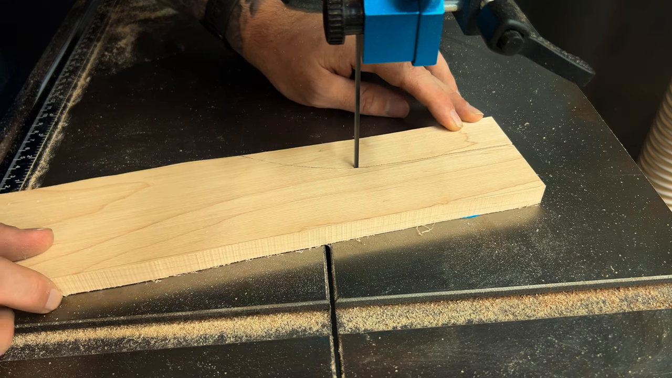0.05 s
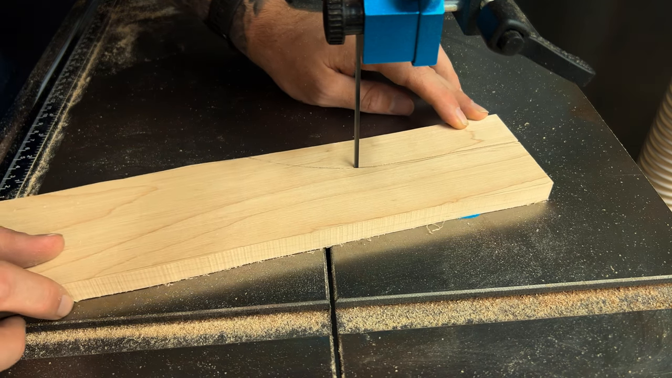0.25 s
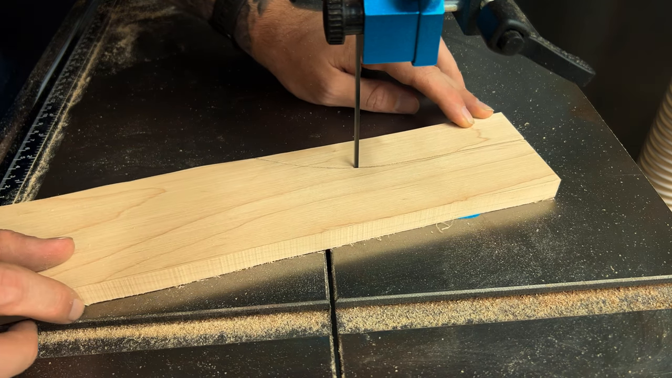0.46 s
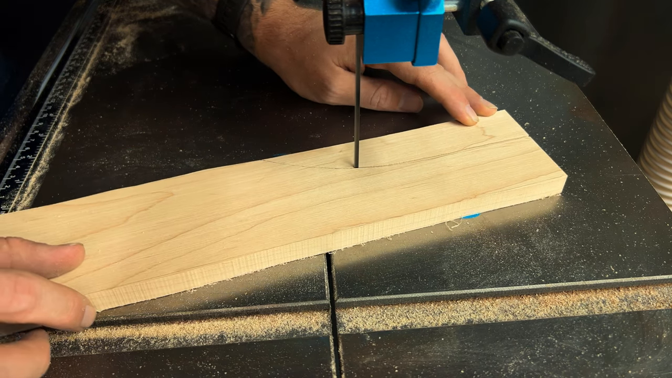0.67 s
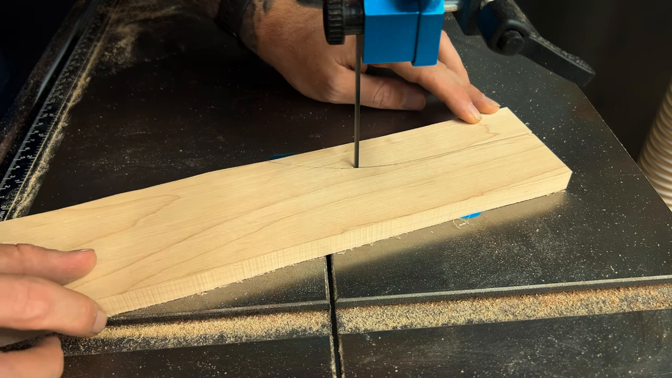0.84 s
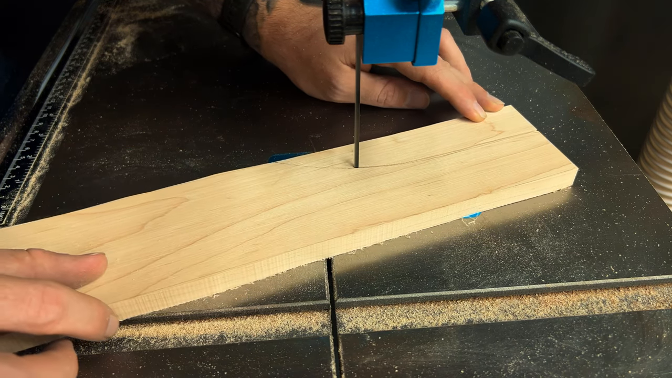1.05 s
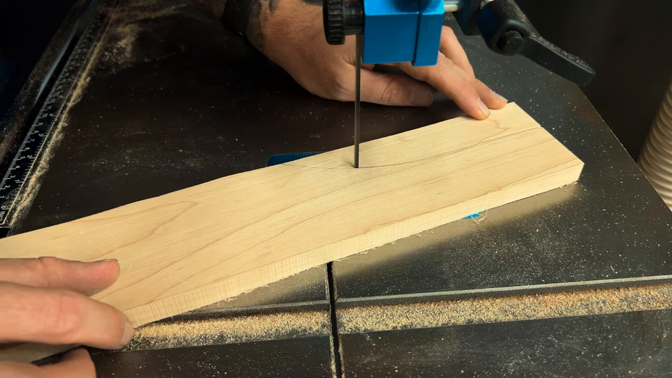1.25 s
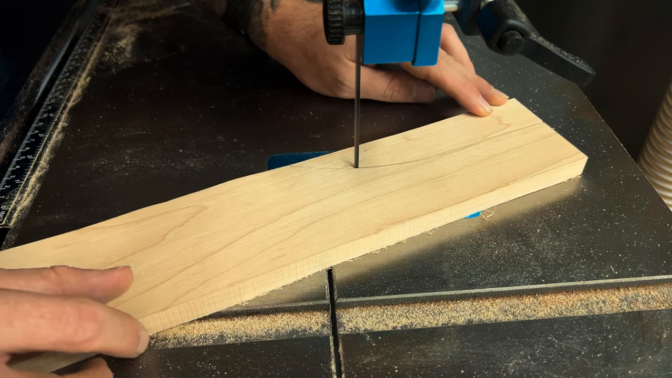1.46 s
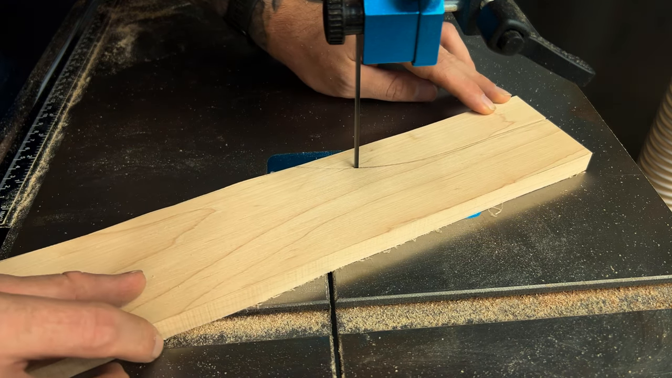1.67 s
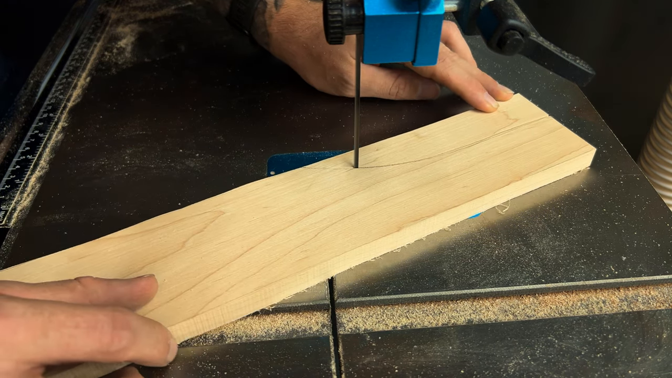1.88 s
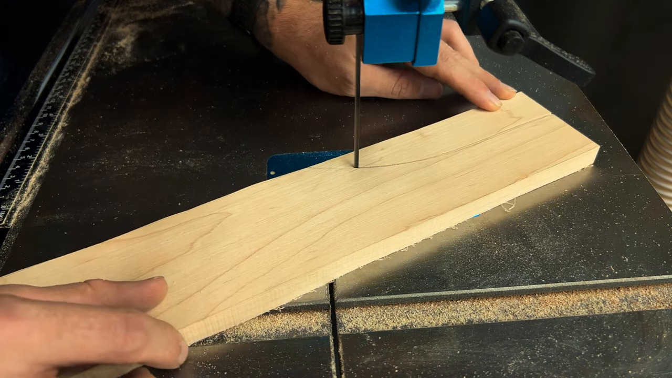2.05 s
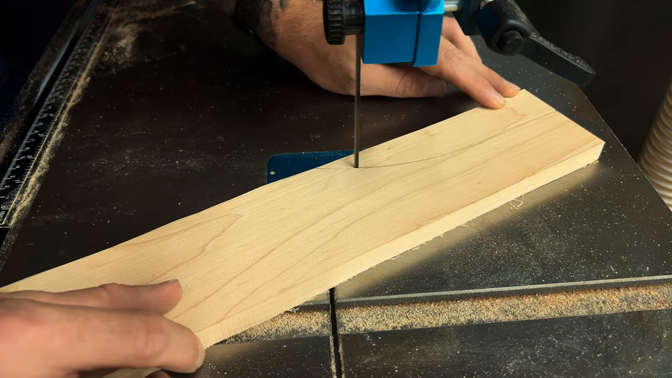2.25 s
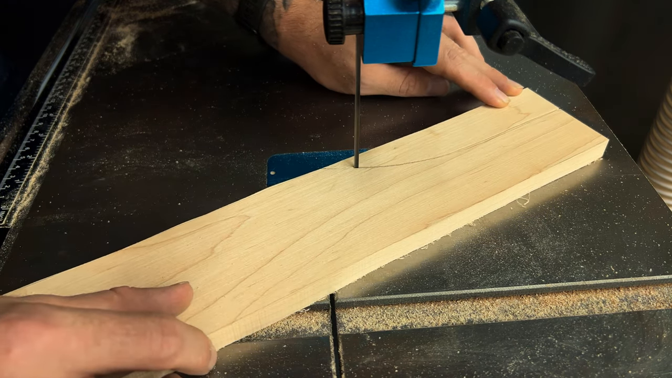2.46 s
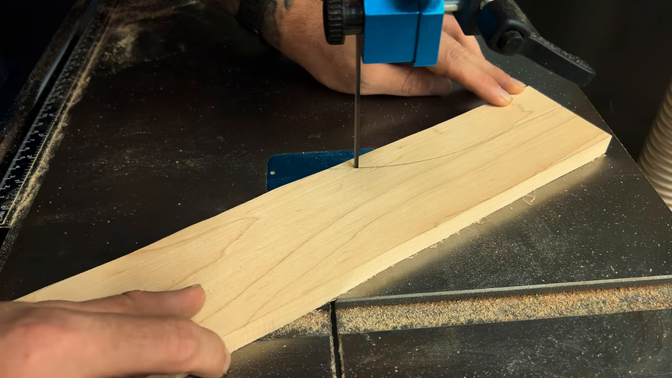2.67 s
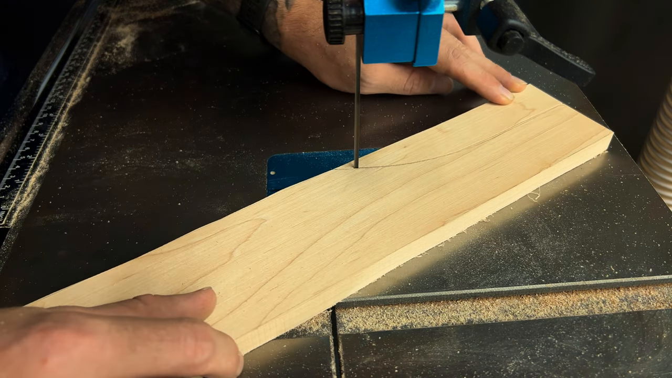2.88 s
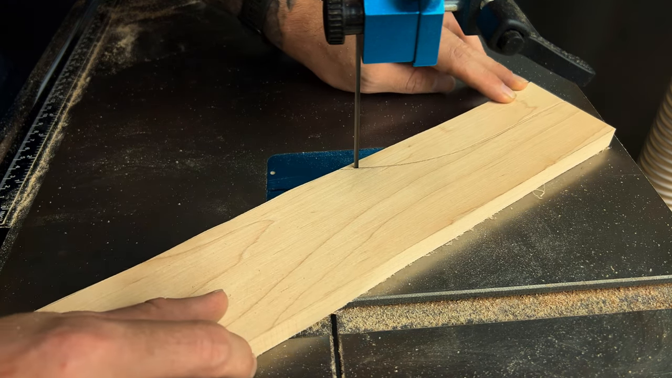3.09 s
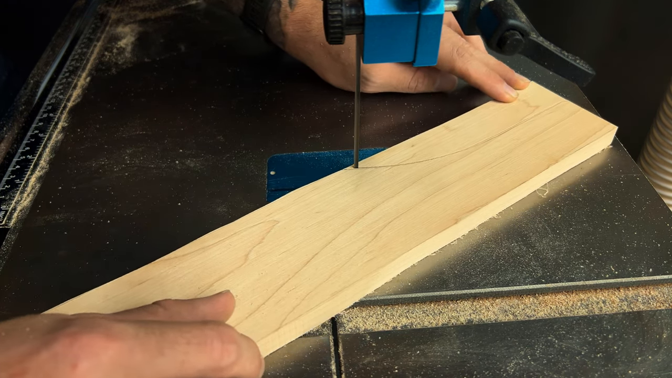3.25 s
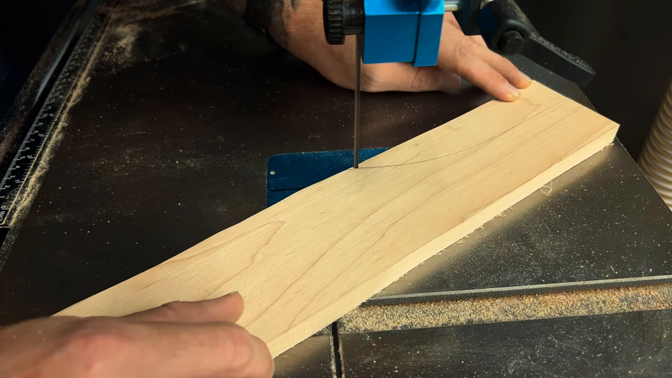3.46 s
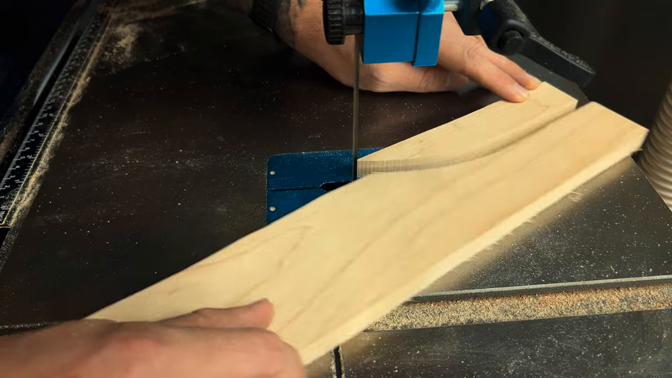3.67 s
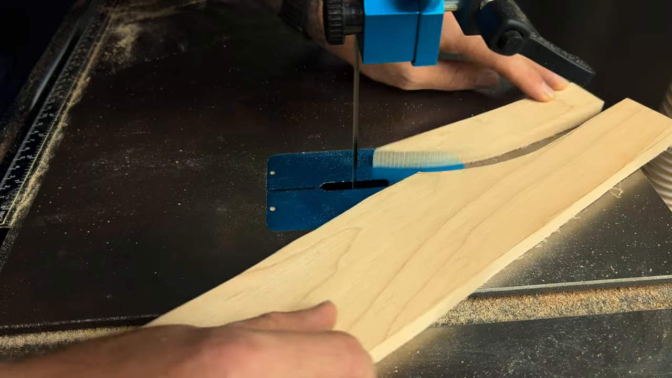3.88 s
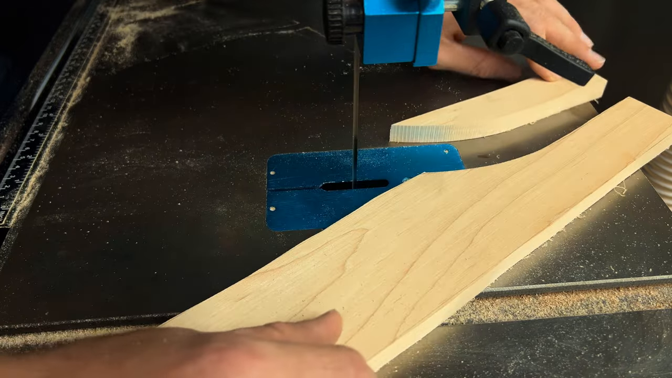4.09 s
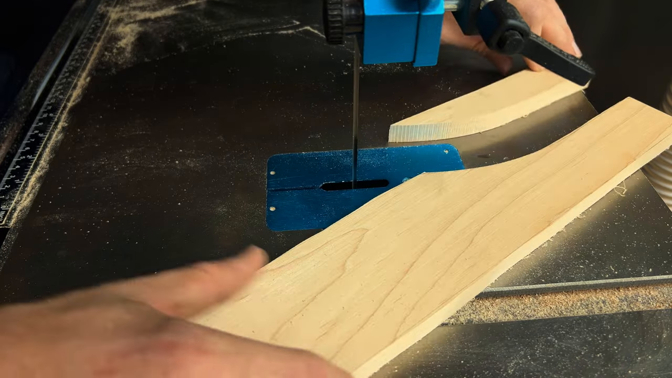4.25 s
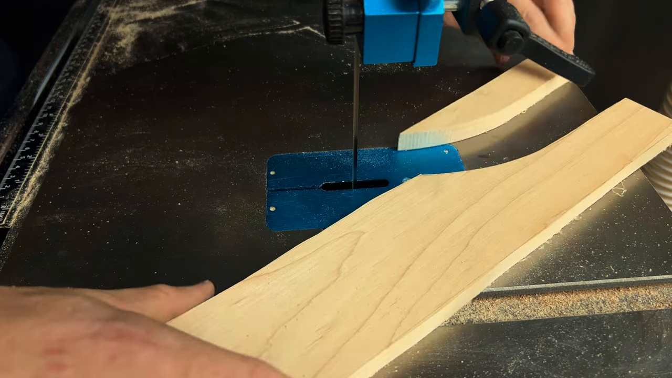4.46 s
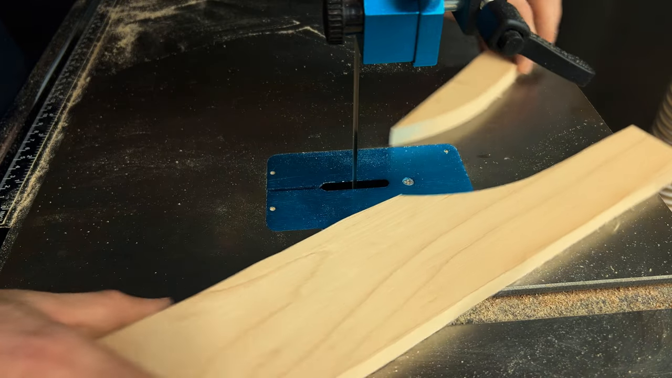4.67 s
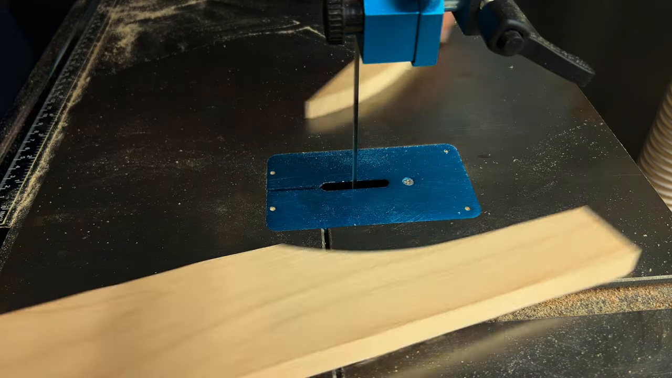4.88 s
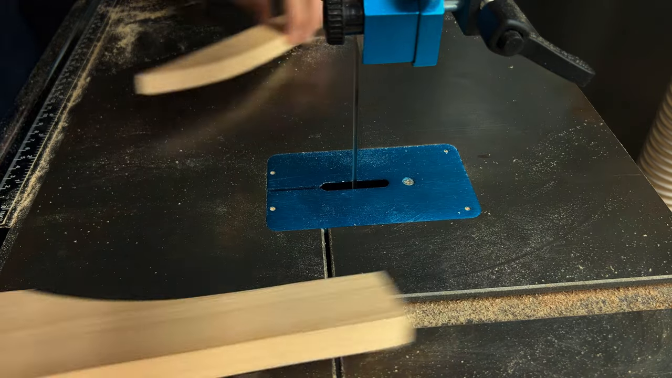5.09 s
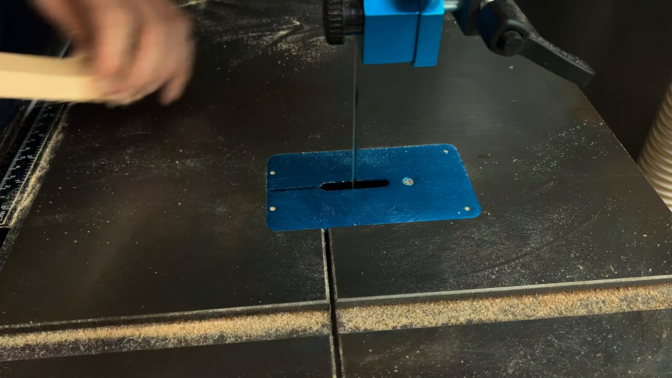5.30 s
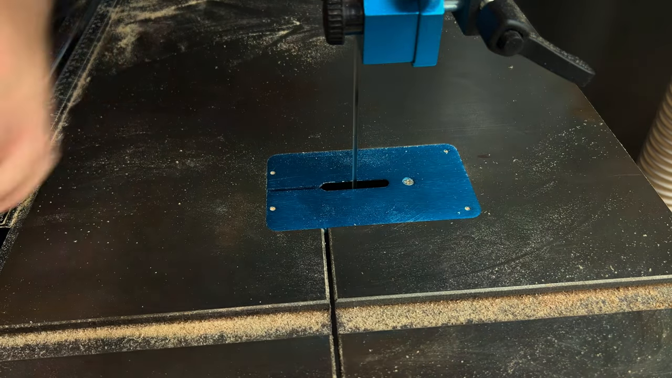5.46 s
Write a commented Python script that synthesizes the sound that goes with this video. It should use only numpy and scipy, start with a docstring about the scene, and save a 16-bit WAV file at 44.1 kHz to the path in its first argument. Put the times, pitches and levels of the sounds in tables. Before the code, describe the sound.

The recording starts mid-cut: a bandsaw blade squeals loudly through a hardwood board at about 4 kHz, blurred and wavering, with a rough octave near 8 kHz and bright hissing rasp. The blade flutters about seventeen times a second, and irregular brief slips of some hundredths of a second make the squeal stutter. From about 0.9 to 2.5 seconds it is harshest, with growl and sharp little chirping digs. Around 2.6 seconds the tone begins to weaken while rasp, ringing and thin whistles near 10 kHz come forward. At 3.6 seconds the blade leaves the wood and everything shrill stops within milliseconds, with a short room reverberation. Until about 5.5 seconds only a much quieter motor hum and low rumble remain, with faint hiss and soft metallic brushes roughly every 0.15 seconds, strongest at first and fading. Close stereo, squeal leaning left.

```python
"""A bandsaw blade squeals near 4 kHz as it cuts a hardwood board in a workshop, then runs free.
Stick-slip gives the squeal, a rough octave and a growl; the blade flutters in the kerf and loses its bite
for moments. Chips rasp, and noise shaped by resonances gives the broad rings of blade and board.
Under it the motor hums and rumbles and the blade brushes its guides."""
import sys
import numpy as np
from scipy import signal
from scipy.fft import rfft, irfft, next_fast_len
from scipy.io import wavfile
from scipy.ndimage import uniform_filter1d, map_coordinates

SR = 44100
rng = np.random.default_rng(int(sys.argv[2]) if len(sys.argv) > 2 else 0)


def to_wav(s):
    """Save 16-bit WAV."""
    ch = np.atleast_2d(s).T  # columns
    pcm = np.round(np.clip(ch, -1, 1) * 32767)  # PCM
    wavfile.write(sys.argv[1], SR, pcm.astype(np.int16))


N = 243873
T = np.arange(N) / SR
EXIT_S = 3.596  # the blade leaves the wood
FLUTTER_HZ, FLUTTER_CREST_S = 16.68, 0.0433  # sideways swing of the blade, and its first slack moment

# The turning board reflects differently to each side. Each row: time in seconds, radians by which left leads
# in the tone, same in the octave, left-right difference in dB of the tone, of the octave, of the rings.
TURN = [(0, 0.6, -0.54, 3, 8, 6.5), (.3, 1.28, -0.34, 2, 6.5, 4.8), (.6, 2, -.2, 12.5, 10.5, 7),
        (.8, 1.04, -.6, 5, 13, 5.7), (1.1, -2, -.4, 4, 8.5, 7.6), (1.5, 0.3, 0, 6, 4.5, 4),
        (2.1, -0.5, 0, 4, 7.5, 1.4), (2.5, 0.3, .4, 3.5, 1.5, .7), (2.8, 0.5, .3, 5, 2, 1.2),
        (3.1, 0.1, .4, 0.5, 8, 1), (3.6, -0.4, .4, -1, 4.5, 1)]


def amp(db):
    """Gain of a level in dB."""
    return 10 ** (np.asarray(db) / 20)


def unit(x):
    """x at rms 1."""
    return x / np.sqrt(np.mean(x ** 2) + 1e-20)


def along(points, hz):
    """Values at hz, interpolated between (Hz, value) points on a log axis."""
    point_hz, values = np.transpose(points)
    return np.interp(np.log(hz + 1), np.log(point_hz + 1), values)


def spectrum(points):
    """Response through (Hz, dB) points."""
    return lambda hz: amp(along(points, hz))


def even(value):
    """The same value at every frequency."""
    return lambda hz: value + 0 * hz


def peak(f, hz, width_hz):
    """Size of a resonance, 1 at its centre."""
    return np.abs(f * width_hz / (hz * hz - f * f + 1j * f * width_hz))


def curves(rows):
    """One value per sample for each column after the time."""
    seconds, *columns = np.transpose(rows)
    return [np.interp(T, seconds, column) for column in columns]


def wobble(rate_hz):
    """A smooth random curve, rate_hz knots a second."""
    knots = rng.standard_normal(int(N * rate_hz / SR) + 4)
    return map_coordinates(knots, [T * rate_hz])


def filtered(x, response):
    """x times a response of frequency."""
    size = next_fast_len(N + SR // 4)
    hz = np.fft.rfftfreq(size, 1 / SR)
    return irfft(rfft(x, size) * response(hz), size)[..., :N]


def pan(lean_db):
    """Left and right gains for a left-right difference."""
    return amp(np.array([lean_db / 2, -lean_db / 2]))


def rush(response, alike):
    """Stereo noise with its mid part at rms 1; alike(hz) is the likeness of the two sides."""
    def mid_side(hz):
        turn = np.arccos(np.clip(alike(hz), -1, 1)) / 2
        return response(hz) * np.array([np.cos(turn), np.sin(turn)])

    mid, side = filtered(rng.standard_normal((2, N)), mid_side)
    return np.array([mid + side, mid - side]) / np.sqrt(np.mean(mid ** 2))


def fuzzy(turns, fuzz_hz, clean, lead=0):
    """A stereo tone blurred by random swings of size and phase, rms 1; left leads by lead radians."""
    blur = wobble(fuzz_hz) + 1j * wobble(fuzz_hz)
    side_phase = .5 * lead * np.array([[1], [-1]])
    return unit(((clean + blur) * np.exp(2j * np.pi * turns + 1j * side_phase)).real)


def patchy(x, patchy_db):
    """x with patches of random gain in time and frequency."""
    z = signal.stft(x, nperseg=512)[2]
    field = uniform_filter1d(rng.standard_normal(z.shape[1:]), size=2, axis=0)  # over frequency
    field = uniform_filter1d(field, size=22, axis=1)  # over time
    return signal.istft(z * amp(patchy_db * unit(field)), nperseg=512)[1][:, :N]


def gripped(bite, share):
    """Gain for a layer that follows the bite in part; its slow mean power stays 1."""
    gain = amp(share * bite)
    return gain / np.sqrt(np.abs(uniform_filter1d(gain ** 2, size=SR // 4)))


def bite_db():
    """Grip of the teeth on the wood: flat-bottomed drops, slight at each flutter swing, deep at each slip."""
    # The blade clearly loses its bite. Each row: time in seconds, length in ms, depth in dB.
    slips = [(.045, 17, 6), (.099, 25, 12.5), (.225, 14, 10), (.286, 24, 16), (.354, 33, 8.5),
             (.405, 9, 9.5), (.457, 35, 6), (.516, 18, 13.5), (.592, 13, 25.5), (.695, 30, 8.5),
             (.755, 18, 5.5), (.815, 8.3, 7.5), (.907, 8, 9.5), (1, 31.2, 22), (1.063, 18, 20.5),
             (1.117, 24, 5.5), (1.351, 13, 19), (1.376, 13, 21.5), (1.433, 8, 8.5), (1.482, 15, 11.5),
             (1.535, 9, 18.5), (1.605, 19, 8), (1.672, 18.7, 5.5), (1.709, 9, 12.5), (1.77, 20, 15.5),
             (1.84, 36, 18.5), (1.948, 14, 11.5), (1.998, 7, 15.5), (2.073, 9, 12), (2.14, 26, 10),
             (2.193, 13, 6), (2.252, 13, 6), (2.38, 8, 5.5), (2.921, 14, 11), (3.037, 16, 8),
             (3.102, 13, 16.5), (3.231, 12, 9), (3.259, 7, 11), (3.295, 22, 10.5), (3.382, 7.4, 6.5),
             (3.47, 20, 12)]
    slack_ms, slack_db, slack_scatter_s = 14.8, 3, .008
    drop, regain = 0.462, 0.693  # fall and rise time scales as shares of the length
    swings = np.arange(FLUTTER_CREST_S, EXIT_S, 1 / FLUTTER_HZ)
    chance = rng.standard_normal((round(N / SR * 20), 2))
    slack = [(s + slack_scatter_s * a, slack_ms, slack_db * abs(b)) for s, (a, b) in zip(swings, chance)]
    grip_db = np.zeros(N)
    for s, ms, db in slack + slips:
        near = slice(max(round((s - .06) * SR), 0), round((s + .06) * SR))
        late_ms = 1000 * (T[near] - s)
        scale_ms = ms * np.where(late_ms < 0, drop, regain)
        grip_db[near] -= db * np.exp(-np.abs(late_ms / scale_ms) ** 2.9)
    return grip_db


def squeal(bite):
    """Stick-slip at the teeth: slack raises the pitch; spiky growl lies below, a rough octave above."""
    # The cut curves, binds and frees. Each row: time in seconds, level in dB of the tone, of the growl
    # below it, of the octave.
    levels = [(0, -27, -52.5, -47), (.35, -28.5, -49, -40), (.65, -30.5, -44, -43.5),
              (1.05, -25, -35, -42.5), (1.4, -28, -33.5, -48), (1.8, -30, -33, -50),
              (2.2, -26.5, -31.5, -43), (2.4, -28.5, -37.5, -50), (2.6, -28.5, -38, -38),
              (3.0, -35, -43.5, -38), (3.2, -36, -46, -45), (3.4, -39, -47, -41.5),
              (3.58, -33.5, -54.5, -33)]
    # Each row: time in seconds, mean pitch in Hz, ratio of the pure tone to its blur.
    pitch = [(0, 4010, 3.5), (.4, 3983, 3), (.65, 3966, 1.86), (.8, 4030, 2.55), (1.3, 4010, 3),
             (1.7, 3966, 3), (2.1, 3990, 2.75), (2.5, 4004, 3.1), (2.8, 3984, 4), (3.1, 3963, 4.6),
             (3.6, 4025, 2.6)]
    # Growl spectrum. Each row: frequency in Hz, relative density in dB.
    growl_points = [(1500, -91.5), (2700, -33.5), (3200, -15.5), (3500, -11.5), (3620, 2), (3750, -0.5),
                    (3900, 5.5), (4020, -6), (4200, -6), (4500, -50.5), (6000, -90)]
    tone_db, growl_db, octave_db = curves(levels)
    lead, octave_lead, lean_db, octave_lean_db, _ = curves(TURN)
    pitch_hz, purity = curves(pitch)
    slack = np.cos(2 * np.pi * FLUTTER_HZ * (T - FLUTTER_CREST_S))
    hz = pitch_hz + 24 * slack + 12 * wobble(45) - .8 * (bite - bite.mean())
    turns = np.cumsum(hz) / SR

    tone = amp(tone_db) * gripped(bite, 0.75) * fuzzy(turns, fuzz_hz=200.9, clean=purity, lead=lead)

    spikes = gripped(1.2 * bite - 1.6 * slack + 4 * np.tanh(wobble(200)), 1)
    growl = amp(growl_db) * spikes * rush(spectrum(growl_points), even(1))

    core = fuzzy(2 * turns - 70 * T, fuzz_hz=218.0, clean=0.35, lead=octave_lead)  # 70 Hz flat
    skirt = rush(lambda f: peak(f, 7780, 500) ** 2, even(.4))
    octave_gain = amp(octave_db) * gripped(bite - 1.1 * slack + 1.7 * wobble(45), 1.6)
    octave = octave_gain * (core + 0.72 * skirt)
    return (tone + growl + digs(turns, growl_db)) * pan(lean_db) + octave * pan(octave_lean_db)


def rings(bite):
    """Tooth scrape excites each broad resonance; each swells in its own short bursts."""
    # Rings of blade and board. Each row: centre in Hz, width in Hz, share of the bite it follows,
    # left-right likeness.
    resonances = [(4990, 480, 0.24, .93), (5976, 440, 0.97, 1), (8970, 1100, 0.49, .7)]
    # Each row: time in seconds, level in dB of each of the three resonances.
    drive = [(0, -40.5, -41, -48.5), (.25, -40, -39, -43), (.6, -36, -52, -48), (1.0, -36.5, -63.5, -50.5),
             (1.35, -38, -56, -52), (1.65, -40.5, -50.5, -47.5), (2.2, -49, -59, -53),
             (2.42, -46.5, -56, -51.5), (2.6, -39, -42.5, -51.5), (3.0, -37.5, -39, -44.5),
             (3.58, -35, -37.5, -44.5)]
    # A ring that sinks as the freed strip of wood grows. Each row: time in seconds, pitch in Hz, level in dB.
    strip = [(0, 7350, -56.5), (.9, 7210, -50), (1.3, 7480, -47.5), (1.6, 7215, -42), (2, 6970, -44),
             (2.3, 6850, -41.5), (2.6, 6840, -58.5), (3.6, 6720, -42)]
    out = board(bite)
    for (hz, width_hz, share, alike), db in zip(resonances, curves(drive)):
        ring = rush(lambda f: peak(f, hz, width_hz) ** 2, even(alike))
        out += amp(db) * gripped(bite * share + 2.3 * wobble(35), 0.59) * ring
    strip_hz, strip_db = curves(strip)
    strip_ring = fuzzy(np.cumsum(strip_hz) / SR, fuzz_hz=853, clean=0)
    out += amp(strip_db) * gripped(bite, 0.27) * strip_ring
    return patchy(out, patchy_db=2.5) * pan(curves(TURN)[-1])


def board(bite):
    """The board drums in two narrow bands that slide and swell as the cut grows."""
    # Each row: time in seconds, low band in Hz, its level in dB, upper band in Hz, its level in dB,
    # looseness of the upper band 0-1.
    bands = [(0, 1010, -75.5, 2000, -53.5, 0.2), (.25, 1004, -66.5, 2003, -52, 0.26),
             (.8, 1004, -68, 1973, -61, 0), (1.3, 992, -61.5, 2005, -59.5, .6),
             (1.9, 985, -67.5, 2046, -58.5, .8), (2.4, 988, -59, 2102, -60, 0.89),
             (2.62, 1021, -55.5, 2107, -48.5, 0.8), (3.1, 995, -56.5, 2086, -54.5, 0.9),
             (3.42, 886, -59, 2000, -52.5, 0.85), (3.6, 857, -76, 1975, -55, 0.96)]
    low_hz, low_db, upper_hz, upper_db, loose = curves(bands)
    low = fuzzy(np.cumsum(low_hz) / SR, fuzz_hz=242.6, clean=0, lead=-.6)
    low_gain = amp(low_db) * gripped(0.16 * bite + 2.2 * wobble(25), 0.82)
    turns = np.cumsum(upper_hz) / SR
    tight_band = fuzzy(turns, fuzz_hz=199.6, clean=0)
    loose_band = fuzzy(turns, fuzz_hz=567.0, clean=0)
    upper = (1 - loose) * tight_band + loose * loose_band
    upper_gain = amp(upper_db) * gripped(0.58 * bite + 1.8 * wobble(25.06), 0.91)
    return low_gain * low + upper_gain * upper


def chips(bite):
    """Wide noise rasp of torn fibres, with the blade's whistles, blurred tones, on top."""
    # Rasp spectrum. Each row: frequency in Hz, relative density in dB.
    rasp_points = [(60, -91.5), (300, -29.5), (650, -7), (1300, -9), (2700, 0.5), (3300, 7.5), (4400, 9),
                   (6600, 2), (8600, 2.5), (11000, 0), (12300, 2), (12800, -6), (14500, -5.5), (15900, -14)]
    # Each row: pitch in Hz, relative level in dB, blur in Hz, start in seconds.
    whistles = [(10428, 0, 30, -1), (10556, -9, 40, 2.7), (9920, -3, 150, 2.9), (14400, -7, 120, 3.1)]
    # Each row: time in seconds, level of the whistles in dB.
    whistling = [(0, -59), (.2, -53), (.6, -54.5), (.8, -70.5), (1.2, -61.5), (1.6, -68.5), (2.2, -53),
                 (2.4, -54), (2.8, -51.5), (3.3, -50), (3.58, -58)]
    rasp_db = -42.5 + 2.5 * np.maximum(T - 1.61, 0)  # grows 2.5 dB/s from 1.61 s as the teeth near the edge
    rasp = rush(spectrum(rasp_points), lambda f: np.interp(f, [7000, 10000, 12000], [.7, .5, .97]))
    rasp_gain = amp(rasp_db) * gripped(0.48 * bite + 1.1 * wobble(12) + 2.1 * wobble(300), 0.41)
    out = rasp_gain * patchy(rasp, patchy_db=3.5)
    whistle_db, = curves(whistling)
    for hz, db, blur_hz, start_s in whistles:
        fade_in = np.clip((T - start_s) / 0.23, 0, 1)
        out += amp(whistle_db + db) * fade_in * fuzzy(hz * T, fuzz_hz=blur_hz, clean=1.2, lead=-0.55)
    return out


def motor(in_wood):
    """Hum lines that waver, over the rumble of frame and wheels; load shifts their levels a little."""
    # Pitch of each hum line in Hz.
    hum_hz = [58.8, 120.2, 356.7, 570, 713.4, 1070.1, 1107.6, 1167.8, 1426.8, 1783.5]
    # Each row, one per line: level in dB, left-right difference in dB, radians by which left leads,
    # waver in dB, rise under load in dB.
    hum = [(-69, 0.2, -0.1, 2.5, 1), (-64.5, 2, 0.5, 2, 0.5), (-57.5, -5, -1.5, 1.4, -0.45),
           (-73, -2.5, 1.1, 5, -1.5), (-70, -2, 1.5, 1, 1), (-76, -5, 2.9, 2.5, 0),
           (-83, -3.5, 2.3, -0.5, 5), (-79.5, -2.5, 2.4, 1, 6.5), (-65.5, -5, -1.5, 2.5, 5),
           (-87, 1.5, -0.5, -1, 0.5)]
    # Rumble spectrum. Each row: frequency in Hz, relative density in dB.
    rumble_points = [(20, -36.5), (45, -8.5), (75, -9.5), (130, -1), (230, 2), (270, -7), (420, -12),
                     (580, -8), (700, -13), (800, -17), (880, -13), (1080, -13), (1250, -24.5), (1400, -16),
                     (1520, -19.5), (1850, -30.5), (1935, -14.5), (2020, -22), (3000, -31.5), (4500, -38),
                     (8000, -85.5)]
    # Each row: frequency in Hz, left-right likeness of the rumble.
    alike_points = [(30, .997), (60, .995), (130, .93), (220, .85), (290, .6), (640, .62), (1400, .5),
                    (2500, .65)]
    # Each row: frequency in Hz, left-right difference of the rumble in dB.
    lean_points = [(30, 0), (60, 0), (90, 1), (130, 4), (250, 0), (600, -2.5), (1300, -3), (2400, 1.5)]
    rumble_db = -57.0 + 1.1 * wobble(11) + 1.1 * in_wood
    out = amp(rumble_db) * rush(spectrum(rumble_points), lambda f: along(alike_points, f))
    out = filtered(out, lambda f: pan(along(lean_points, f)))
    for hz, (db, lean_db, lead, waver_db, load_db) in zip(hum_hz, hum):
        angle = 2 * np.pi * hz * T + 0.56 * wobble(6.9) + rng.uniform(0, 2 * np.pi)
        sides = np.sin(angle + np.array([[lead / 2], [-lead / 2]]))
        level_db = db + waver_db * np.tanh(wobble(12) + 1.8 * wobble(30)) + load_db * in_wood
        out += np.sqrt(2) * amp(level_db) * pan(lean_db)[:, None] * sides
    return out


def guides():
    """Over steady air hiss and block ring, both swell as the blade loop brushes its guides."""
    # Resonances of the guide blocks. Each row: centre in Hz, width in Hz, relative level in dB.
    block_rings = [(1935, 83, 6), (4870, 350, 0.3), (5590, 160, -2), (7000, 380, -4.5)]
    # Hiss spectrum. Each row: frequency in Hz, relative density in dB.
    hiss_points = [(300, -90.5), (1500, -28), (2600, 11), (3500, 3), (6000, 1.5), (8400, -1.5),
                   (11000, 1.5), (12500, -2.5), (15000, 0), (15900, -5.5)]
    idle_db, air_db = -78.5, -78.5

    def block_response(f):
        return sum(amp(db) * peak(f, hz, width_hz) ** 1.2 for hz, width_hz, db in block_rings)

    blocks = rush(block_response, even(.75))
    hiss = rush(spectrum(hiss_points), lambda f: np.interp(f, [3000, 14000], [.65, .92]))
    block_gain = (amp(idle_db) + brushing(swing=1, at_db=-74.0)) * amp(1.5 * wobble(60))
    hiss_gain = amp(air_db) + brushing(swing=1.1, at_db=-75)
    return block_gain * blocks + hiss_gain * hiss


def shop(x):
    """Room reverberation: noise in which each frequency dies at its own speed."""
    # Each row: frequency in Hz, time to fall 60 dB in seconds.
    decay_points = [(500, 0.72), (2000, .45), (4000, 0.46), (8000, 0.39), (11000, 0.61), (15000, 0.7)]
    hz, t, z = signal.stft(rng.standard_normal((2, SR // 2)), SR, nperseg=256)
    fall_db = -60 * t / along(decay_points, hz)[:, None]
    tail = signal.istft(z * amp(fall_db), SR, nperseg=256)[1]
    return signal.fftconvolve(x, tail / np.linalg.norm(tail[0]), axes=1)[:, :N]


def digs(turns, growl_db):
    """A tooth digs in: a burst of a few ms, begun in phase with the squeal and pitched at or below 3952 Hz."""
    # Hard digs. Each row: time in seconds, peak in dB.
    jabs = [(.3048, -25), (.9182, -20.5), (1.0265, -27), (1.0796, -22.5), (1.2483, -18), (1.3889, -22.5),
            (1.4642, -28), (1.5023, -21.5), (1.6445, -19.5), (1.7324, -20.5), (1.8054, -21.5),
            (1.8663, -21.5), (1.921, -19.5), (2.0284, -22.5), (2.109, -22.5), (2.431, -22.5),
            (2.5038, -19.5)]
    dig_hz, spread_hz, rise_s = 3952, 130, .0018
    out, t = np.zeros(N), np.arange(SR // 60) / SR
    # lesser digs at random moments, about 9 dB over the growl
    moments, sizes = rng.uniform(0, EXIT_S, size=60), rng.standard_normal(size=60)
    small = [(s, growl_db[round(s * SR)] + 9 + 3 * size) for s, size in zip(moments, sizes)]
    swell = (t / rise_s) ** 2 * np.exp(2 - 2 * t / rise_s)
    for s, db in small + jabs:
        start = round(s * SR)
        hz = dig_hz - spread_hz * abs(rng.normal())
        out[start:][:len(t)] += amp(db) * swell * np.cos(2 * np.pi * (hz * t + turns[start]))
    return out


def brushing(swing, at_db):
    """Gain swells at each brush; swing scales dB differences from a -70 dB brush, which sounds at at_db."""
    # About two brushes each time the loop comes round. Each row: time in seconds, strength in dB.
    brushes = [(3.719, -65), (3.872, -63.5), (4.04, -71.5), (4.172, -65), (4.35, -72), (4.505, -68.5),
               (4.636, -71), (4.775, -70.5), (4.84, -70), (4.955, -72.5), (5.14, -72.5), (5.31, -79),
               (5.43, -78), (5.53, -73)]
    rise_s, fall_s = .03, .065
    gain = np.zeros(N)
    for s, db in brushes:
        shape = np.exp(-((T - s) / np.where(T < s, rise_s, fall_s)) ** 2)
        gain += amp(at_db + swing * (db + 70)) * shape
    return gain


def scene():
    """The cut and its reverberation over motor and guides; it stops in a few ms as the last teeth break out."""
    bite = bite_db()
    in_wood = 1 / (1 + np.exp(np.clip((T - EXIT_S) / .0015, -50, 50)))
    cut = in_wood * (squeal(bite) + rings(bite) + chips(bite))
    return cut + amp(-15.0) * shop(cut) + motor(in_wood) + guides()


def record(dry):
    """Keep nothing above the band limit of 15.8 kHz."""
    return filtered(dry, lambda hz: hz < 15800)


dry = scene()
out = record(dry)
to_wav(out)
```